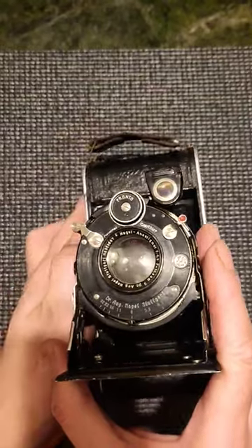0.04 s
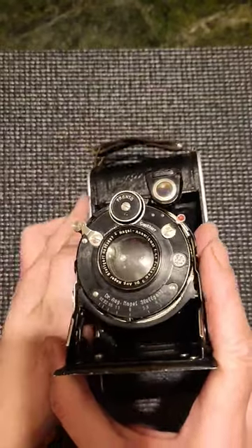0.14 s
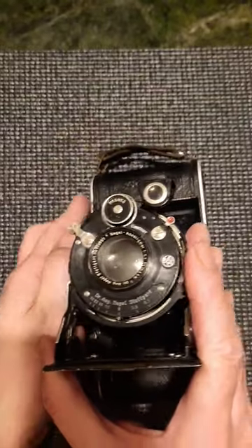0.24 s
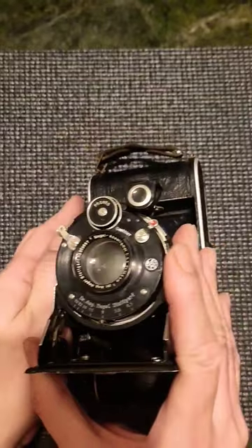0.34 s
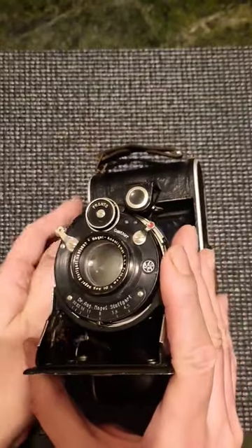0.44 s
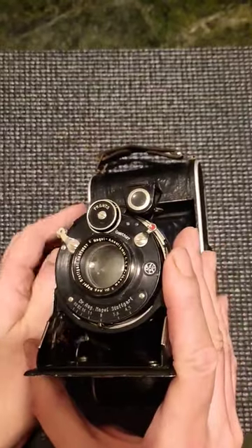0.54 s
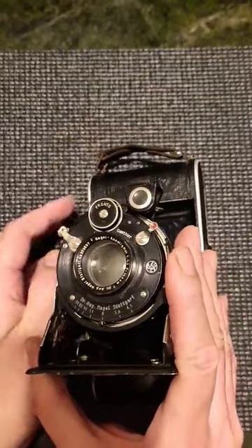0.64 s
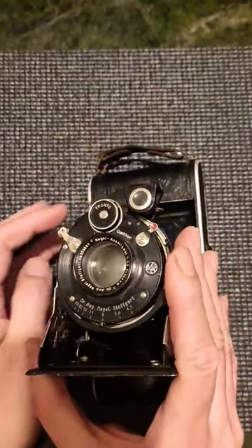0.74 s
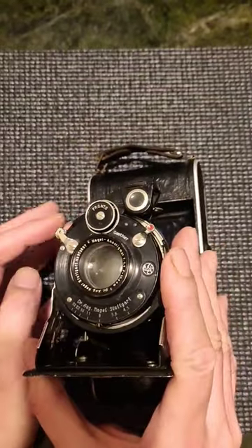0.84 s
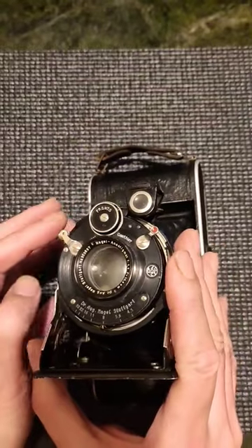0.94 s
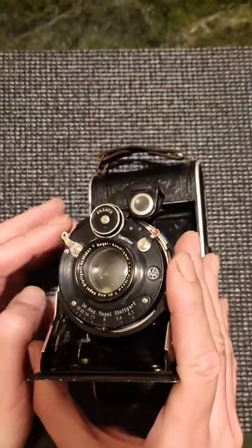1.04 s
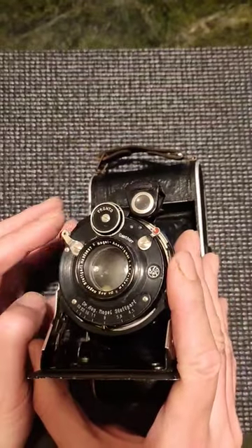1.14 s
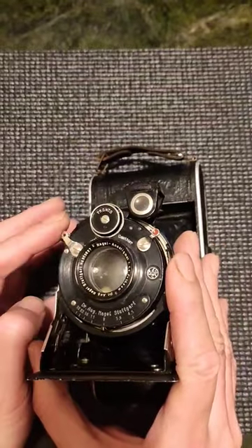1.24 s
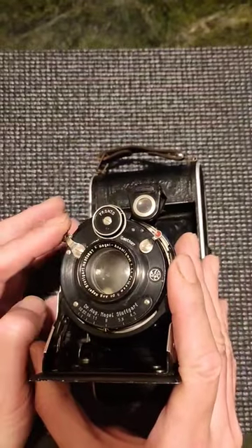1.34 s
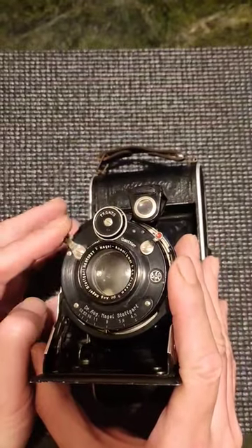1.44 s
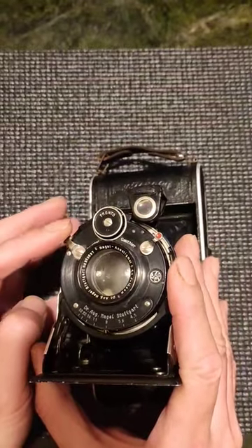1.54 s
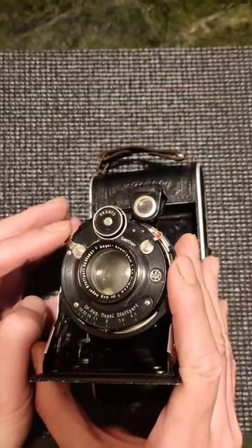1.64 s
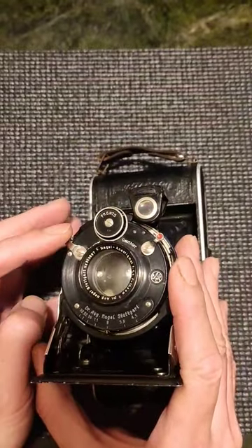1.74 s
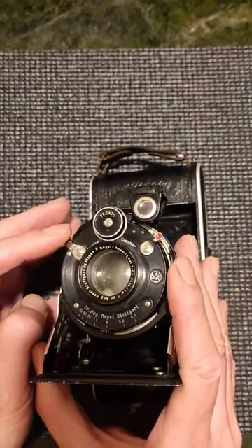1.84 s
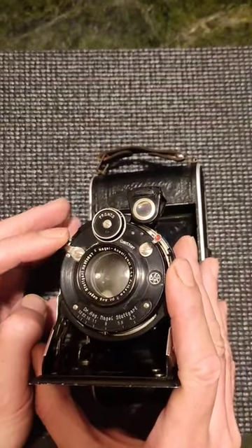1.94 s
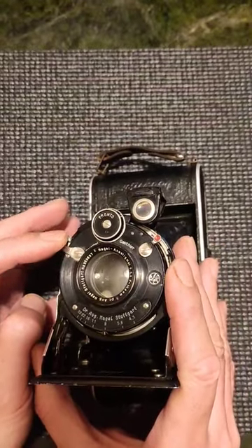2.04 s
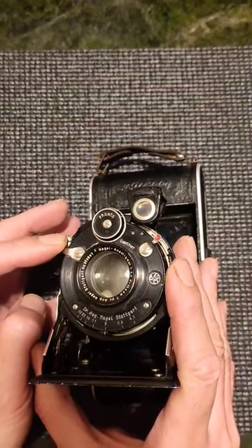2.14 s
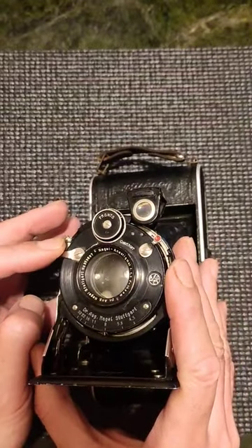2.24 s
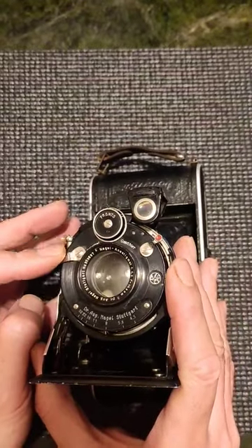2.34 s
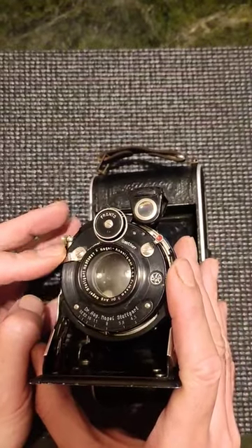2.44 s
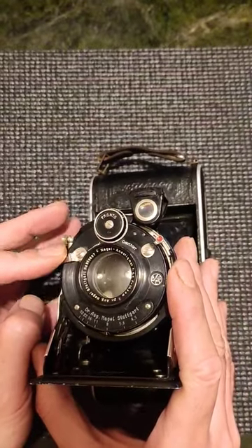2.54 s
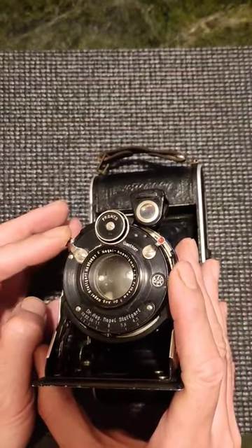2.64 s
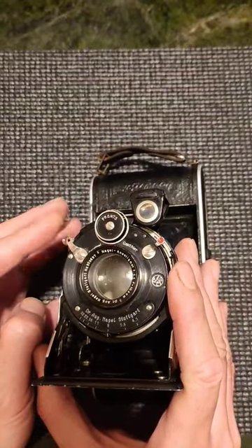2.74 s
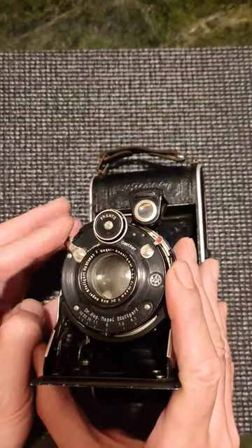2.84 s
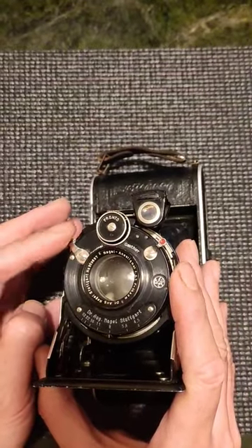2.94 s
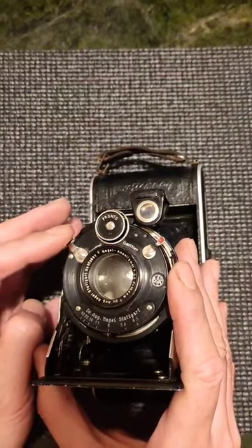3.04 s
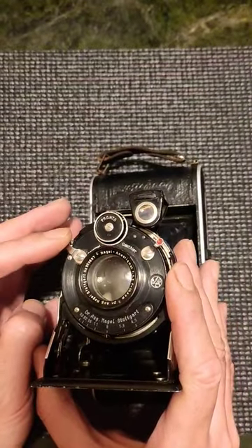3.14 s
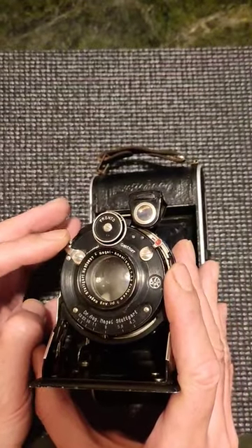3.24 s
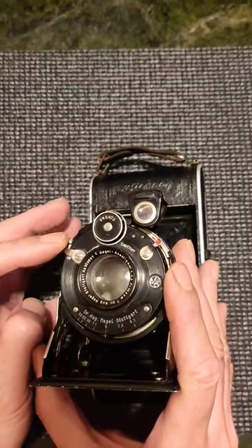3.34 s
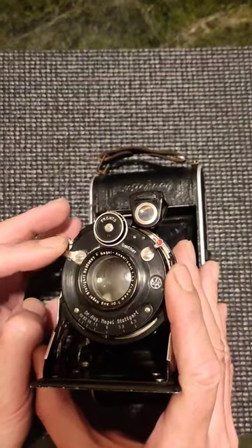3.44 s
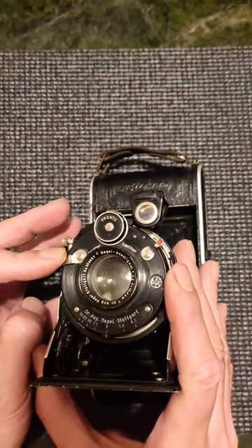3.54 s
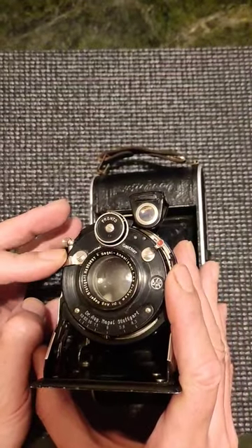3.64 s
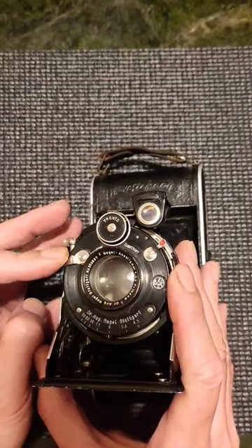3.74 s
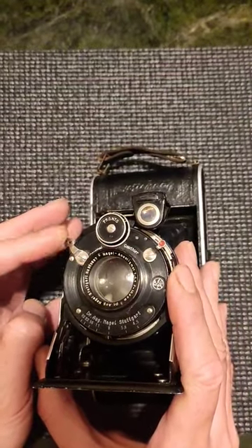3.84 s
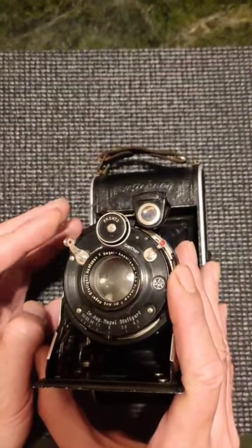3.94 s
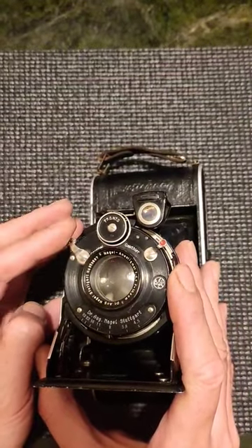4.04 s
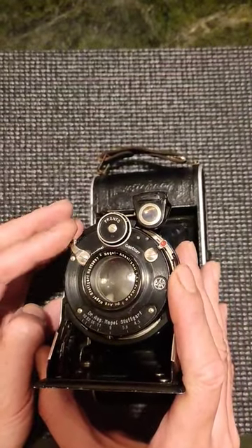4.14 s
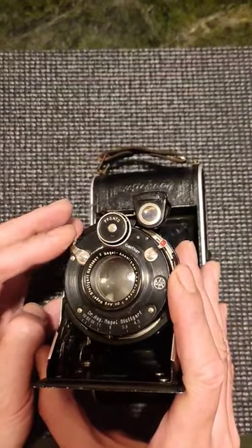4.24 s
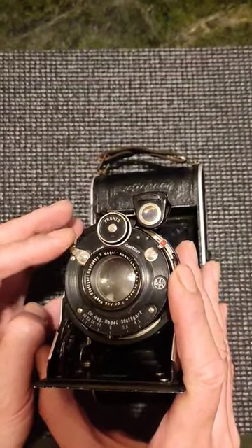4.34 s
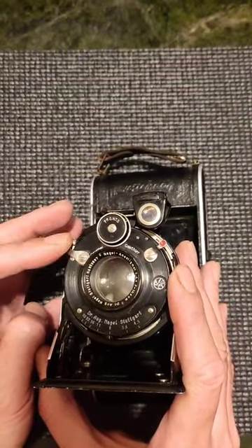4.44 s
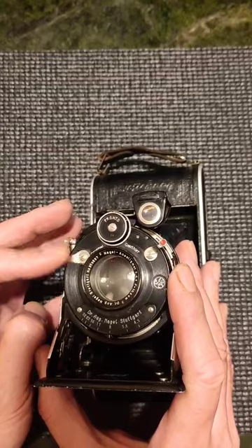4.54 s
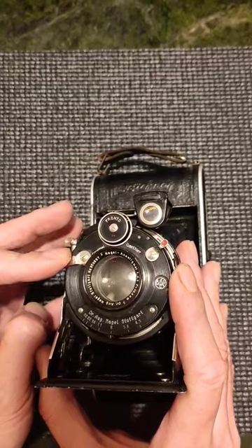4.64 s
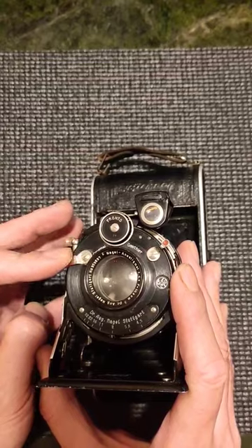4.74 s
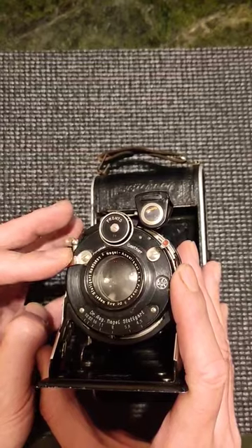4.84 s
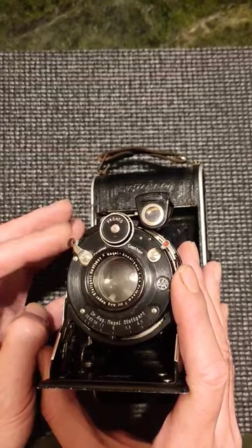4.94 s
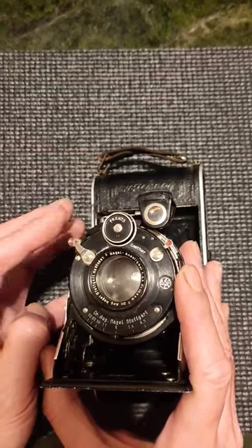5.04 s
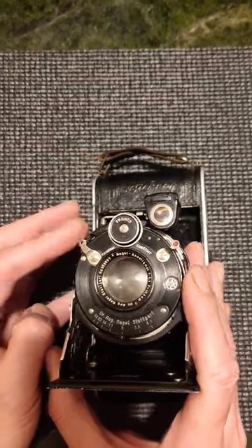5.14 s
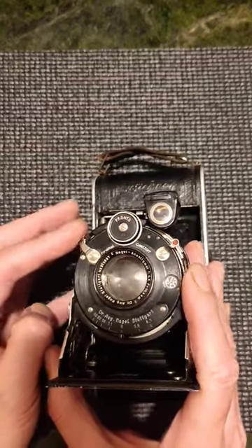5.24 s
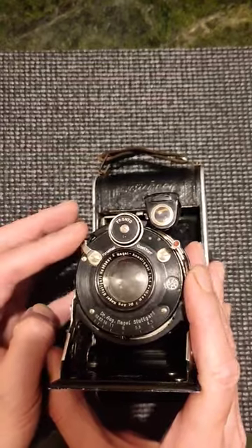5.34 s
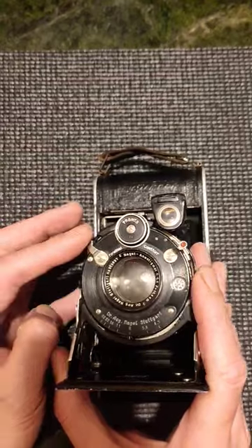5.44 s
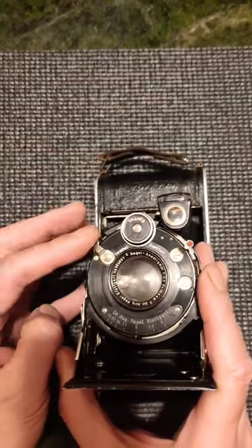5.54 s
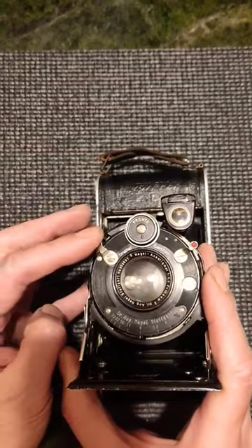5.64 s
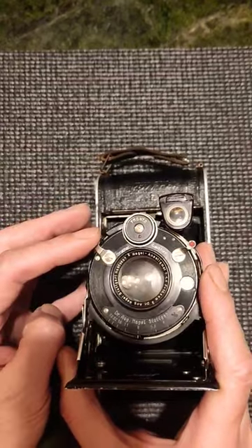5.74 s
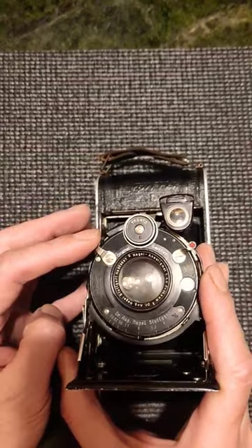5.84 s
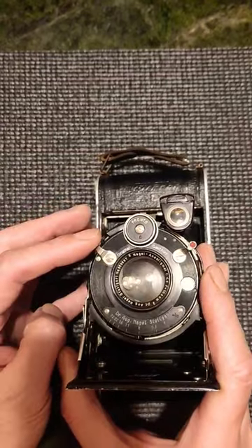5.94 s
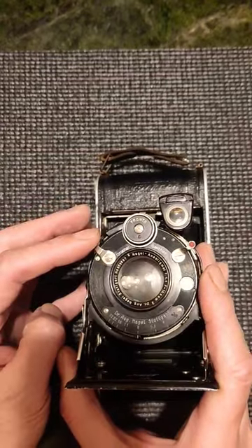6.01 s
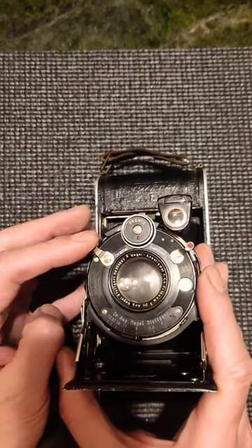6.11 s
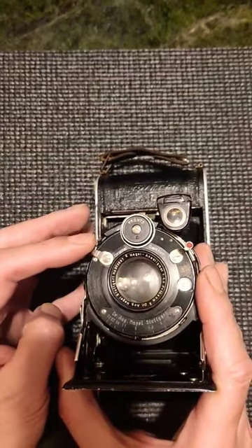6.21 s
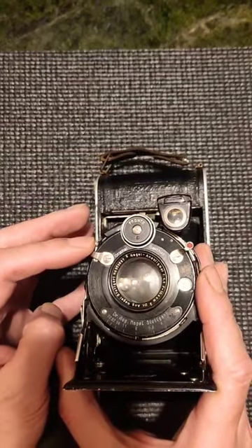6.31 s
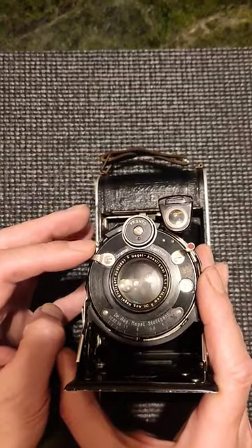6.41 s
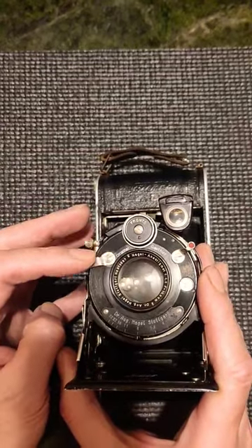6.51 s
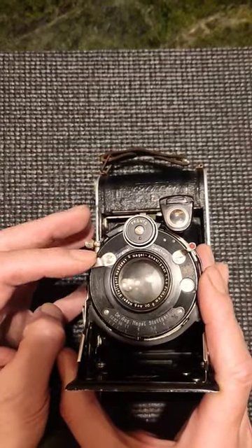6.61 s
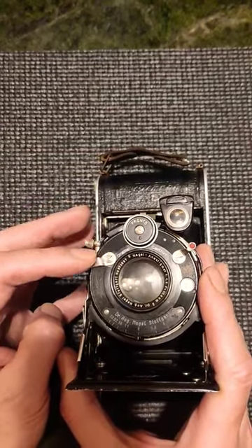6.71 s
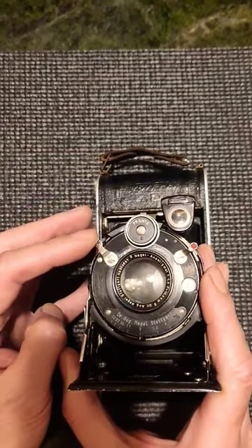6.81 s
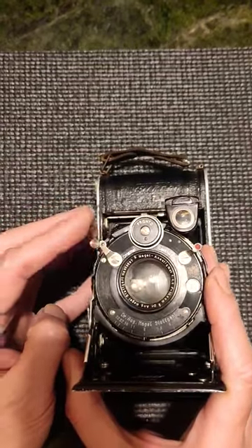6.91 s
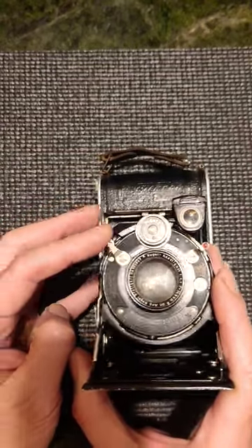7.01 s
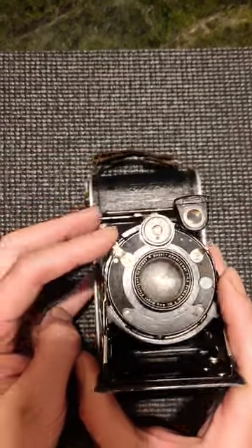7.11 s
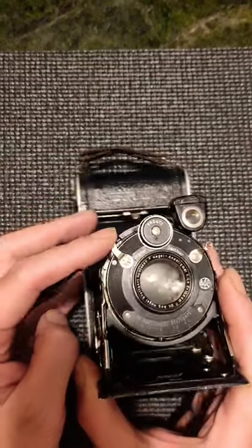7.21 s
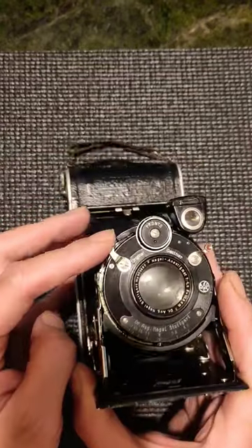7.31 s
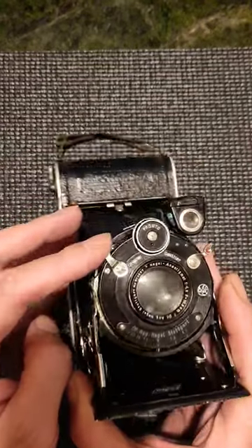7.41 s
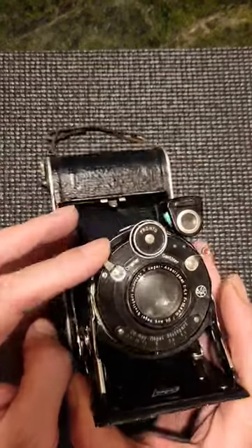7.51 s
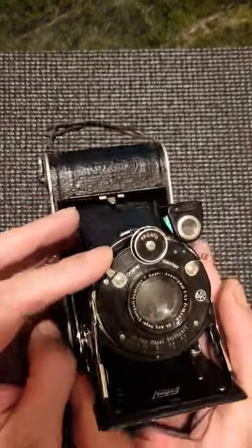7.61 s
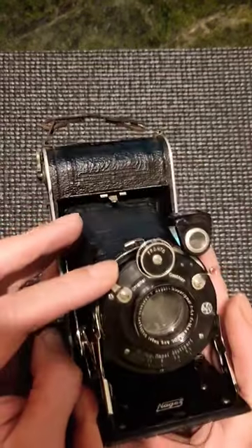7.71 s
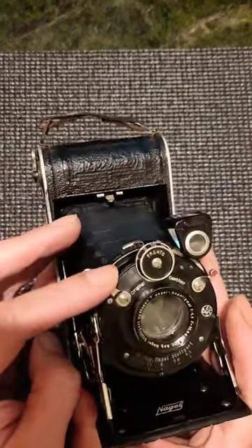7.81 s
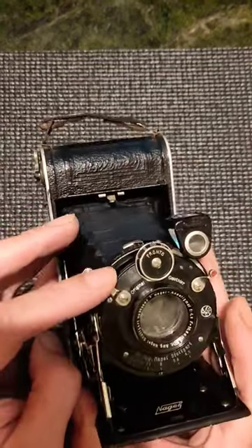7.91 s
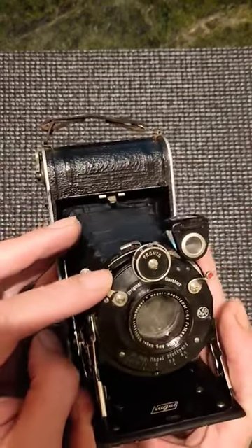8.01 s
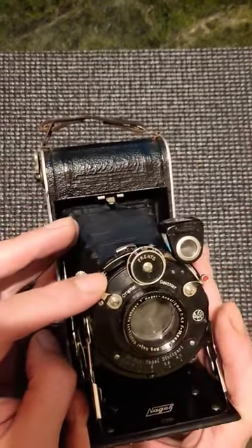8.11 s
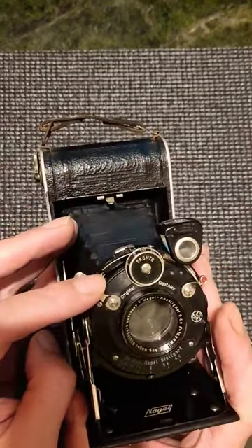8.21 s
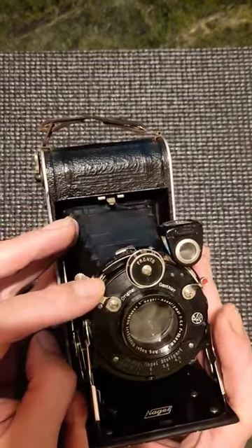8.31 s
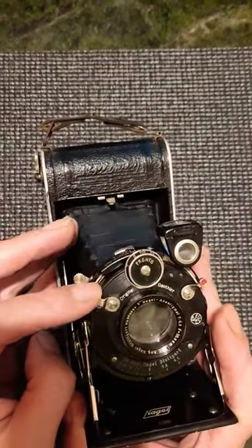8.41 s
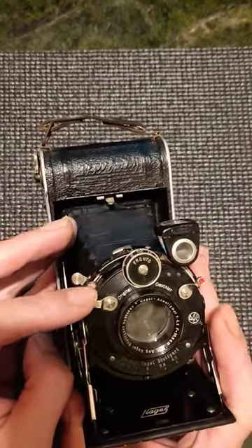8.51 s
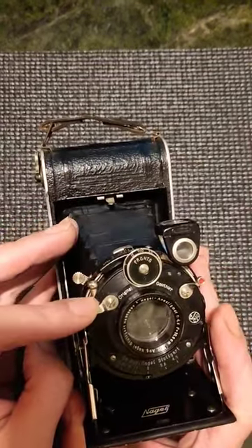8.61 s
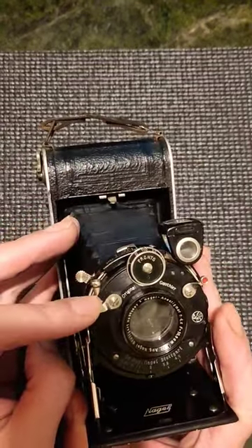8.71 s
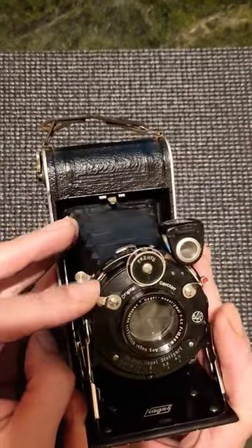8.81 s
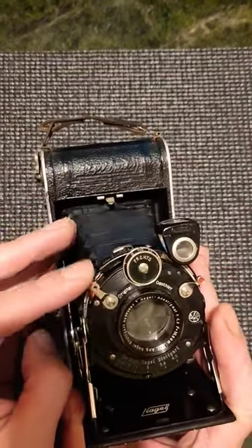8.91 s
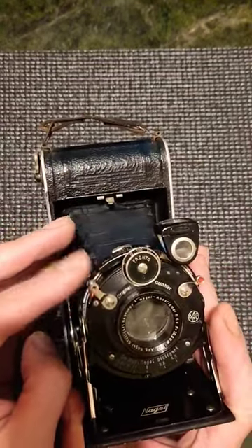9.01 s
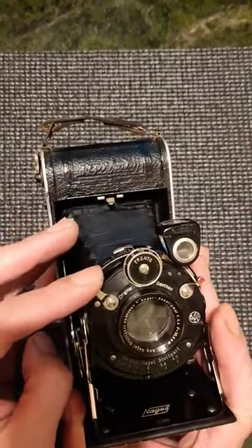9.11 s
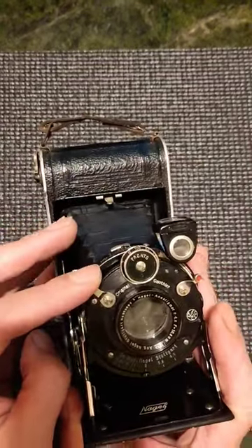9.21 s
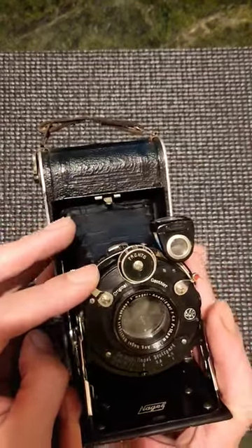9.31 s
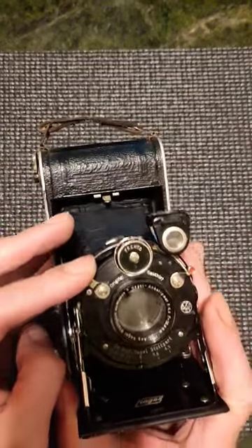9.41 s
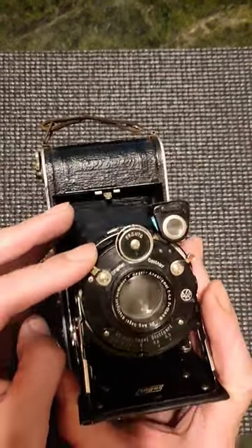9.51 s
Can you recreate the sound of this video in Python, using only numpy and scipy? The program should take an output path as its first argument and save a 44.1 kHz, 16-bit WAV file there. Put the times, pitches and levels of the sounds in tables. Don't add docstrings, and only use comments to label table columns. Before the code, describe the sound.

Hands stroke and grip a small metal and leather camera, with dry whispery friction and light taps. Five crisp, loud shutter clicks come at uneven intervals, each a rapid run of tiny metal impacts, then a quieter snap as the lever springs back. Tiny spring ticks sit around them. Close stereo microphone, short soft room echo, low hum and a faraway engine behind.

```python
import sys
import numpy as np
from scipy import signal
from scipy.fft import rfft, irfft
from scipy.io import wavfile
from scipy.ndimage import uniform_filter1d

SR = 44100
rng = np.random.default_rng(int(sys.argv[2]) if len(sys.argv) > 2 else 0)


def volts_from_decibels(level):
    exponent = np.asarray(level, float) / 20
    return 10 ** exponent


def digitize_waveform(pressure):
    field = np.atleast_2d(pressure).T
    bounded = np.clip(field, -1, 1)
    quanta = np.round(bounded * 32767).astype(np.int16)
    wavfile.write(sys.argv[1], SR, quanta)


N = 421596

# housing in dB, case in dB, front plate in dB,
# blade tick in dB, chatter length in ms.
TRIP = (-1.5, -19, -10.5, -4, 2.16)
CATCH = (0.5, -26, -21, -4.5, 2)
OPENING = (1, -42, -22.5, -4.5, 1.5)
SLAM = (-1.4, -35.5, -15, -8.5, 2.5)
CATCH_MS, SLAM_MS = 1.9, 1.9


def firing(trip, open_ms, trip_db, open_db, slam_db):
    stages = [(0, trip_db, TRIP), (CATCH_MS, trip_db, CATCH),
              (open_ms, open_db, OPENING), (open_ms + SLAM_MS, slam_db, SLAM)]
    return [(trip + ms / 1000, *(db + np.array(rings[:-1])), rings[-1]) for ms, db, rings in stages]


# frequency in Hz, level in dB, decay time t60 in seconds.
HOUSING = [(4330, -9.5, 0.019), (4776, 1, 0.029), (4985, 0, 0.024), (4880, 6, 0.033), (5460, -9.5, 0.0097),
           (6280, -11, .012), (7083, -6.5, 0.0037)]
CASE = [(422, -4.5, 0.15), (575, -7.5, .04), (860, -6, 0.017), (962, 6.5, 0.1), (1084, 2.5, 0.16)]
PLATE = [(1860, 1, .04), (1945, -1, .03), (2649, -4, .018), (3030, -2, .022), (3340, 2, .02)]
BLADES = [(8900, -18, 0.0027), (9130, -8, 0.015), (10500, 2.5, 0.03), (12000, -7.5, 0.0055),
          (14200, -3, 0.0048), (15200, -2.5, 0.018)]
SHUTTER_PARTS = (HOUSING, "housing"), (CASE, "case"), (PLATE, "plate"), (BLADES, "blades")
# catch trips in seconds, blades fly open in ms later, trip in dB, opening in dB,
# slam on the stop in dB.
FIRES = [
    (2.4772, 12.6, -22.5, -14.5, -10.5),
    (3.6843, 10.9, -24, -13.5, -15),
    (4.7041, 11.6, -23.5, -15.5, -12),
    (6.6248, 11.9, -24, -15, -12),
    (8.7127, 12.4, -23.5, -12, -12.5),
]
# time in seconds, strength in dB, share of the plate in dB.
SHUTS = [
    (2.5005, -21, 4),
    (3.7073, -18.5, -1),
    (4.7275, -20, 0.5),
    (6.648, -14.5, -2),
    (8.7347, -21.5, -7),
    (8.7445, -34, 6),
]
# housing in dB, case in dB, front plate in dB, blade tick in dB.
SHUT_RINGS = (-1.9, -25, -11, -7.5)


def shutter():
    fired = [blow for row in FIRES for blow in firing(*row)]
    shut = struck(SHUTS, SHUT_RINGS, shared=(0, 1, 1, 0), ms=2.6)
    return blows(fired + shut, SHUTTER_PARTS, trim_db=(0.78, 3, 4.4, 5), crack_db=34.5, damping=1.45)


# frequency in Hz, level in dB, decay time t60 in seconds.
BED = [(1610, -64, 0.023), (1900, 14, 0.045), (2240, 0.5, 0.095)]
STRUTS = [(2550, 0.5, 0.038), (3270, -2, 0.059), (3235, 2, 0.034), (3636, -48, .02)]
# time in seconds, strength in dB, share of the frame in dB,
# chatter length in ms.
LEVER = [
    (2.7952, -31, -1.5, 2.5),
    (3.9642, -25.5, 0.5, 3),
    (5.0728, -23, -5, 1.92),
    (6.954, -25.5, -4, 1.8),
    (8.989, -26, -1, 2.5),
]
# housing in dB, bed in dB, struts in dB, blade tick in dB, case in dB.
LEVER_RINGS = (3.2, -15.5, -8, -2.5, -18)


def lever_return():
    parts = (HOUSING, "housing"), (BED, "plate"), (STRUTS, "plate"), (BLADES, "blades"), (CASE, "case")
    sprung = struck(LEVER, LEVER_RINGS, shared=(0, 1, 1, 0, 0))
    return blows(sprung, parts, trim_db=(0.35, 7.5, 5.9, 8.1, 4), crack_db=36, damping=1.87)


# time in seconds, strength in dB, share of the blades in dB.
TICKS = [(2.345, -53, -2), (2.729, -56, -2), (2.747, -46, -8), (2.781, -50, -1), (3.236, -58.5, 0),
         (3.645, -53.5, 4.5), (3.939, -48, -5), (4.669, -51, -6), (4.673, -56.5, 1), (5.046, -48.5, -4),
         (6.589, -55.5, 6), (6.915, -46.5, -7), (8.521, -51.5, -2), (8.677, -50.5, 1.5), (8.954, -46, -2)]
# housing in dB, case in dB, front plate in dB, blade tick in dB.
TICK_RINGS = (-0.7, -13.5, -6, -0.5)


def spring_ticks():
    ticked = struck(TICKS, TICK_RINGS, shared=(0, 0, 0, 1), ms=1.4)
    return blows(ticked, SHUTTER_PARTS, trim_db=(0.95, 0.98, 1.1, 1.3), crack_db=36.5, damping=2.1)


# frequency in Hz, level in dB, decay time t60 in seconds.
BELLOWS = [(376, -15, 0.03), (472, 7, 0.065), (706, -13, 0.016)]
# time in seconds, strength in dB, share of the metal in dB,
# chatter length in ms.
KNOCKS = [
    (0.3146, -43.5, 16, 2.7),
    (0.4039, -55, 3, 5),
    (1.0562, -40, 7, 1.1),
    (7.2754, -53, -1, 6.1),
    (7.315, -55.5, -11, 2),
    (7.3904, -48, -2.5, 6.3),
    (7.6177, -50, -1, 6.6),
    (7.7692, -51, 6, 4.2),
]
# time in seconds, strength in dB, share of the struts in dB,
# chatter length in ms.
CREAKS = [
    (1.1594, -69, 1, 6.7),
    (7.1861, -49, 1, 8),
    (7.195, -50, 0.5, 8.9),
    (7.2694, -46, 10.5, 4.2),
    (7.8003, -61.5, 2, 6.3),
]
# housing in dB, case in dB, bed in dB, struts in dB, bellows in dB.
KNOCK_RINGS = (-4, 1, -7, -8, -8.5)
CREAK_RINGS = (5.5, -39, -3, -6, -39)


def handling_knocks():
    parts = (HOUSING, "housing"), (CASE, "case"), (BED, "plate"), (STRUTS, "plate"), (BELLOWS, "case")
    knocked = struck(KNOCKS, KNOCK_RINGS, shared=(1, 0, .5, .5, -.5))
    creaked = struck(CREAKS, CREAK_RINGS, shared=(-1, 0, 0, 1, 0))
    return blows(knocked + creaked, parts, trim_db=(0, 6.5, 6.5, 8.0, -3), crack_db=38, damping=4.1)


def camera():
    fires, lever, knocks = shutter(), lever_return(), handling_knocks()
    echoes = room(fires, wet_db=-12) + room(lever, wet_db=-10.5) + room(knocks, wet_db=-6.5)
    heard = fires + lever + spring_ticks() + knocks + echoes
    return signal.sosfilt(signal.butter(3, 290, "high", fs=SR, output="sos"), heard)


def struck(rows, rings_db, shared, ms=None):
    offsets_db, shared = np.array(rings_db), np.array(shared)
    return [(s, *(db + offsets_db + share * shared), *(rest or [ms])) for s, db, share, *rest in rows]


PLACES = {"housing": (-5.3, 0.0087, 0.59), "case": (0.5, 0.047, 1), "plate": (0.49, 0.07, 1),
          "blades": (-0.37, .25, 1)}


def blows(rows, parts, trim_db, crack_db, damping):
    out = np.zeros((2, N + 8192))
    t = np.arange(1024) / SR
    hz = np.fft.rfftfreq(2048, 1 / SR)
    for s, *parts_db, ms in rows:
        spread = t / (max(ms, .3) / 1000)
        swell = np.minimum(spread / 0.38, 1) * np.exp(-spread)
        sparse = rng.random((3, 1024)) < .25
        both, left, right = whitened(rng.standard_normal((3, 1024)) * sparse * swell)
        detune = 1 + .01 * rng.standard_normal(8)
        at = round(s * SR)
        for (modes, place), db, trim in zip(parts, parts_db, trim_db):
            pan_db, lag_ms, unlike = PLACES[place]
            late = irfft(rfft(both) * np.exp(-2j * np.pi * hz * lag_ms / 1000))
            chatter = np.array([late + unlike * left, both + unlike * right])[:, :1024]
            chatter = chatter * volts_from_decibels(np.array([[pan_db / 2], [-pan_db / 2]]))
            answer = ring(modes, detune, crack_db, damping)
            sound = signal.fftconvolve(chatter, answer[None], axes=1)
            louder_port = np.sqrt((sound ** 2).mean(0)).max()
            out[:, at:at + sound.shape[1]] += sound * volts_from_decibels(db + trim) / louder_port
    return out[:, :N]


def ring(modes, detune, crack_db, damping):
    t = np.arange(2048) / SR
    hz, db, t60 = np.transpose(modes)[:, :, None]
    decay = volts_from_decibels(db - 60 * t * damping / t60)
    tones = (decay * np.sin(2 * np.pi * hz * detune[:len(modes), None] * t)).sum(0)
    edges = np.clip([.86 * hz.min(), 1.118 * hz.max()], 50, .45 * SR)
    band = signal.butter(3, edges, "band", fs=SR, output="sos")
    crack = whitened(rng.standard_normal(len(t)) * volts_from_decibels(-60 * t / 0.0027)) * volts_from_decibels(crack_db)
    return (tones + signal.sosfilt(band, crack)) * np.hanning(4096)[2048:]


def whitened(x):
    z = rfft(x, 4096)
    smooth_power = uniform_filter1d(abs(z) ** 2, size=22, axis=-1)
    return irfft(z / np.sqrt(smooth_power + 1e-20))[..., :2048]


# frequency in Hz, decay time t60 in seconds.
ROOM = [(250, 0.32), (660, 0.5), (1740, 0.3), (4590, 0.36), (12100, 0.25)]


def room(x, wet_db):
    t = np.arange(SR // 2) / SR
    taps = rng.standard_normal((2, SR // 2))
    taps *= np.clip((t - .007) / .01, 0, 1)
    hz, t, z = signal.stft(taps, SR, nperseg=256)
    walls = [(300, 6.0), (1000, -1.5), (2000, 3.5), (5000, -0.5), (9000, 1.0), (14000, 1.5)]  # (Hz, dB)
    fading_db = read(walls, hz)[:, None] - 60 * t / read(ROOM, hz)[:, None]
    tail = signal.istft(z * volts_from_decibels(fading_db), SR, nperseg=256)[1]
    return volts_from_decibels(wet_db) * signal.oaconvolve(x, tail / np.linalg.norm(tail[0]), axes=1)[:, :N]


# middle in seconds, length in seconds, dull drag in dB,
# dry scrape in dB.
STROKES = [(0.105, 0.39, -68, -62), (.47, 0.17, -65.5, -69), (.93, 0.61, -89, -73),
           (1.12, 0.11, -83, -67.5), (1.407, 0.078, -62, -75), (1.57, 0.19, -73, -69),
           (1.95, 0.54, -84, -73), (2.21, .3, -83, -73), (2.402, 0.15, -66.5, -71.5),
           (3.313, 0.041, -87, -75), (3.433, 0.15, -64, -67), (3.619, .1, -74, -76.5),
           (4.441, 0.2, -65.5, -78), (4.63, 0.093, -67, -73), (5.429, 0.17, -63.5, -69.5),
           (5.92, .2, -70, -76), (6.14, 0.22, -79, -73.5), (6.45, .26, -68.5, -71.5), (7.11, .1, -74, -71),
           (7.459, 0.15, -69.5, -77), (7.9, 0.16, -69.5, -84.5), (8.15, 0.59, -68, -75),
           (8.44, .22, -64, -69.5), (8.634, 0.17, -67.5, -85), (9.239, 0.18, -67.5, -79),
           (9.41, 0.11, -60.5, -66)]
# dull drag in dB, dry scrape in dB.
GRIP_DB = (-78, -83)


def stroked(order):
    s, length, db = np.transpose(STROKES)[[0, 1, order + 2], :, None]

    def level_db(t):
        swell = (volts_from_decibels(db) ** 2 * np.exp(-8 * ((t - s) / length) ** 2)).sum(0)
        return 10 * np.log10(swell + volts_from_decibels(GRIP_DB[order]) ** 2)
    return level_db


def slid(s, length, hz, share, db):
    wide = 1 + max(share, .02)
    band = [(hz / wide ** 2, -50), (hz / wide ** .5, -5), (hz, 0), (hz * wide ** .5, -5), (hz * wide ** 2, -50)]
    return band, lambda t: np.maximum(db - 35 * ((t - s) / length) ** 2, -200)


# frequency in Hz, density in dB per Hz.
RUB_COLOUR = [(200, -26.5), (400, 0), (900, -6), (1500, -12.5), (2500, -16.5), (5000, -48.5)]
SCRAPE_COLOUR = [(800, -31), (1700, -1), (2400, -1), (3800, 0.5), (6500, -8), (8500, -18.5), (15000, -27.5)]
# middle in seconds, length in seconds, pitch in Hz,
# width as a share, level in dB.
SLIDES = [(0.084, 0.16, 2760, .02, -67), (0.126, 0.17, 5400, 0.36, -65), (0.28, 0.13, 5900, 0.038, -70.5),
          (0.867, 0.2, 6100, 0.27, -69.5), (0.93, 0.15, 4330, 0.067, -68), (1.0, 0.14, 5200, .09, -65),
          (1.167, 0.049, 2160, 0.19, -68), (1.85, 0.11, 6140, .04, -70), (1.95, .2, 3650, .08, -76),
          (2.143, 0.16, 5930, 0.24, -69.5), (2.214, .25, 4270, 0.12, -72.5), (2.296, .26, 5040, 0.12, -71),
          (3.282, 0.09, 6160, 0.23, -77), (3.388, .24, 4930, .06, -68.5), (6.205, 0.18, 5200, 0.11, -75.5),
          (8.157, 0.15, 5050, 0.035, -76)]


def rubbing_hands():
    layers = [(RUB_COLOUR, stroked(order=0)), (SCRAPE_COLOUR, stroked(order=1))]
    layers += [slid(*row) for row in SLIDES]
    return noise(layers, size=512, patchy_db=2.2, flicker_db=2.0)


# frequency in Hz, level in dB.
HUM = [(120, -61), (240, -71), (360, -88)]


def hum():
    t, out = np.arange(N) / SR, np.zeros((2, N))
    for hz, db in HUM:
        wander = uniform_filter1d(uniform_filter1d(rng.standard_normal((2, N)), size=3000), size=3000)
        waver, drift = evened(wander)
        phase = 2 * np.pi * hz * t + 0.64 * drift + np.array([[0], [.3]])
        out += volts_from_decibels(db + 4 + 0.3 * waver) * np.sin(phase)
    return out


# frequency in Hz, density in dB per Hz.
FLOOR = [(12, -32), (20, 1.5), (66, -14.5), (82, -24.5), (103, -13.5), (124, -3), (147, -18.5),
         (242, -19.5), (387, -21), (693, -22.5), (2480, -33.5), (4950, -36.5), (7930, -49.5), (13800, -37),
         (15000, -47)]
RUMBLE_COLOUR = [(15, 9), (30, 0), (60, -9), (85, -13), (140, -39.5), (400, -71.5)]
DRONE_TONE = [(70, -54.5), (90, -4), (98, 0.5), (106, 0), (125, -53)]
DRONE_BODY = [(100, -37.5), (150, 3), (210, 0), (290, -1.5), (420, -49.5)]
FLOOR_DB = -54.5
# time in seconds, level in dB.
TRAFFIC = [(0.0, -49.5), (2.5, -51.5), (3.3, -54), (4.2, -55), (5.9, -56.5), (6.35, -50.5), (7.1, -53.5),
           (8.5, -49.5), (9.56, -57)]
# time in seconds, level in dB.
ENGINE = [(0.0, -64), (0.8, -73.5), (4.1, -69), (4.9, -65.5), (5.6, -72), (7.2, -61), (7.4, -59.5),
          (7.8, -66.5), (8.0, -63), (8.6, -63), (9.56, -65)]
BODY_DB, BODY_FOLLOWS = -68, 0.73


def background():
    engine = follow(ENGINE)
    layers = [(FLOOR, lambda t: FLOOR_DB - 4.0 + 0 * t), (RUMBLE_COLOUR, follow(TRAFFIC)),
              (DRONE_TONE, engine), (DRONE_BODY, lambda t: BODY_DB + BODY_FOLLOWS * (engine(t) + 70))]
    return noise(layers, size=2048, patchy_db=0.8, flicker_db=0.3)


# frequency in Hz, left-right likeness.
SAME = [(60, 0.5), (180, 0.5), (550, -0.3), (1650, -0), (4970, 0.1), (15000, -0.1)]


def noise(layers, size, patchy_db, flicker_db):
    hop, hz = size // 4, np.fft.rfftfreq(size, 1 / SR)
    t = np.arange(N // hop + 5) * hop / SR
    a, b, c, d, patches = rng.standard_normal((len(t), len(hz), 5)).T
    patches = uniform_filter1d(patches, size=size // 70, axis=0)
    patches = evened(uniform_filter1d(patches, size=16000 // size, axis=1))
    flicker = evened(uniform_filter1d(rng.standard_normal(len(t)), size=4))
    power = sum(evened(volts_from_decibels(read(colour, hz)))[:, None] ** 2 * volts_from_decibels(level_db(t)) ** 2
                for colour, level_db in layers)
    same = np.clip(read(SAME, hz), -1, 1)[:, None]
    left = a + 1j * b
    z = np.array([left, same * left + np.sqrt(1 - same ** 2) * (c + 1j * d)])
    plain = signal.istft(left[:, :200], nperseg=size, noverlap=3 * hop)[1].std()
    z = z * np.sqrt(power) * volts_from_decibels(patchy_db * patches + flicker_db * flicker) / plain
    return signal.istft(z, nperseg=size, noverlap=3 * hop)[1][:, :N]


def evened(x):
    return x / np.sqrt(np.mean(x ** 2) + 1e-20)


def read(points, hz):
    f, value = np.transpose(points)
    return np.interp(np.log(hz + 1), np.log(f + 1), value)


def follow(rows):
    return lambda t: np.interp(t, *np.transpose(rows))


def scene():
    return camera() + rubbing_hands() + hum() + background()


def roll_off(x):
    return signal.sosfilt(signal.butter(12, 16650, fs=SR, output="sos"), x)


def record(dry):
    hz = [0, 14150, 14600, 16000, 16600, SR / 2]
    edge = signal.firwin2(255, hz, volts_from_decibels(np.array([0, 0, -37, -35, -65, -90])), fs=SR)
    mix = signal.oaconvolve(dry, edge[None], "same")
    return roll_off(mix)


dry = scene()
out = record(dry)
digitize_waveform(out)
```